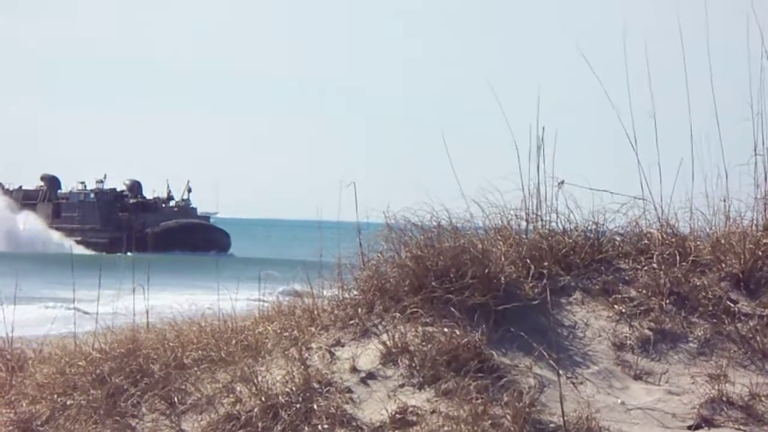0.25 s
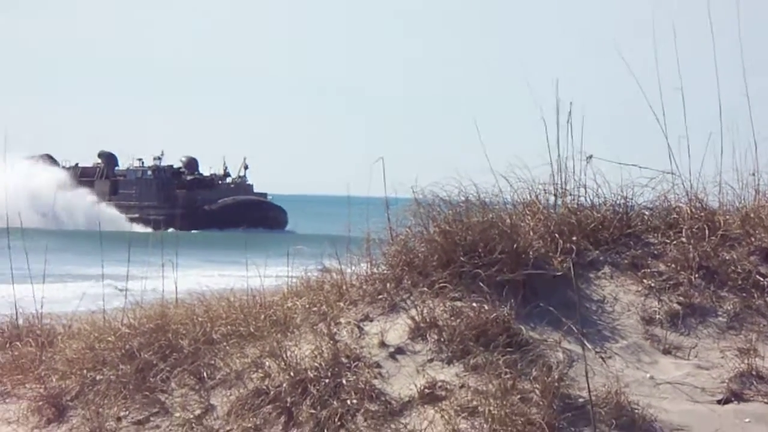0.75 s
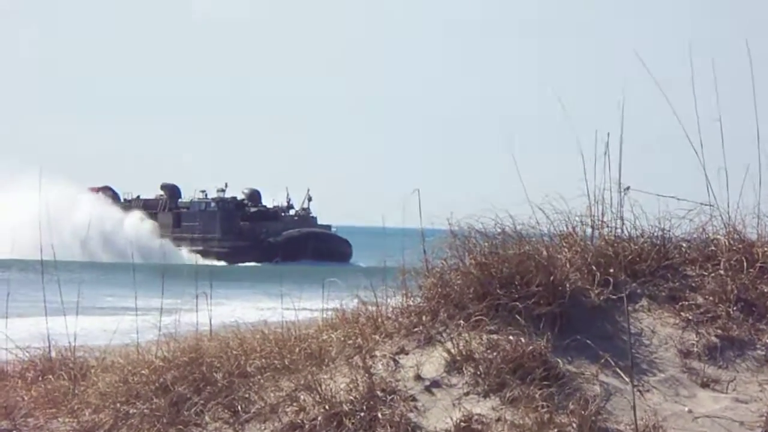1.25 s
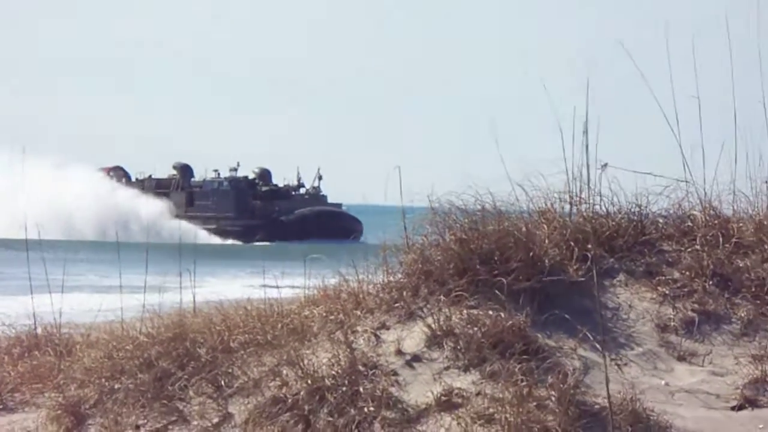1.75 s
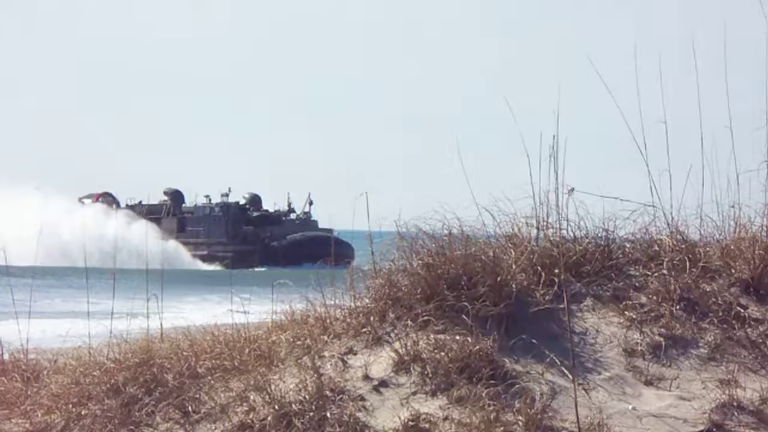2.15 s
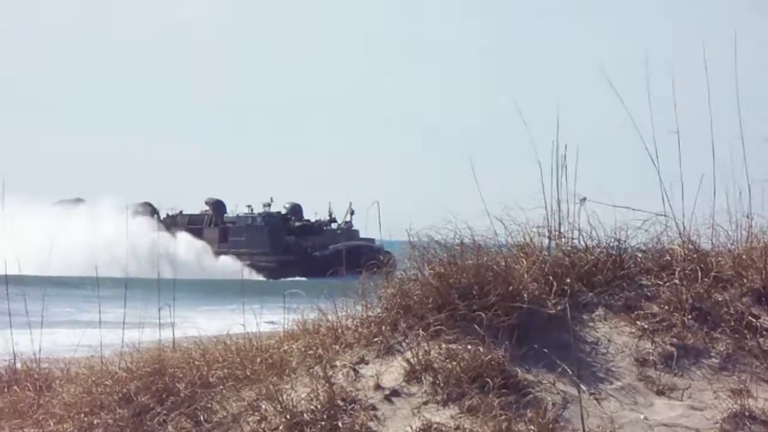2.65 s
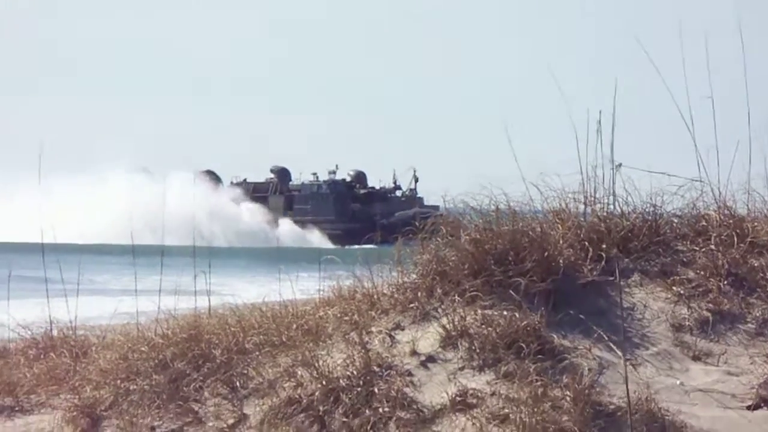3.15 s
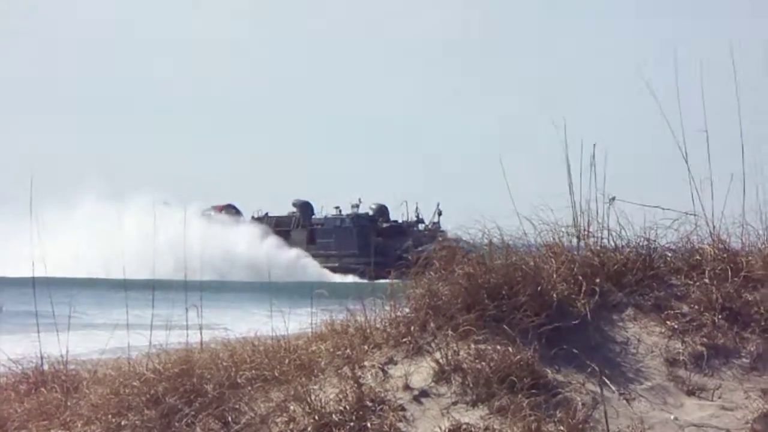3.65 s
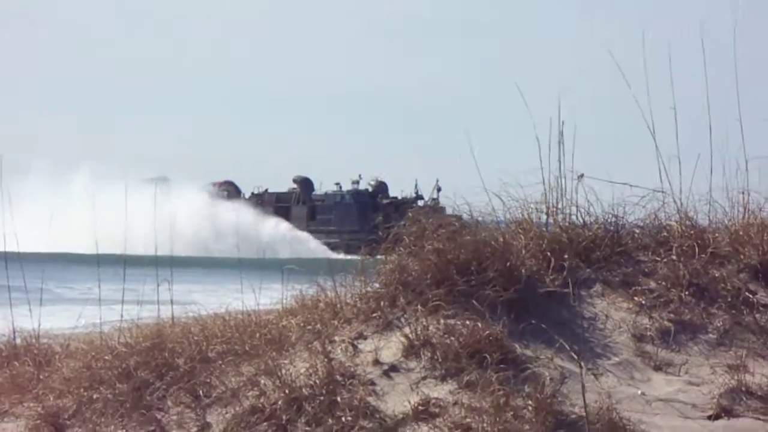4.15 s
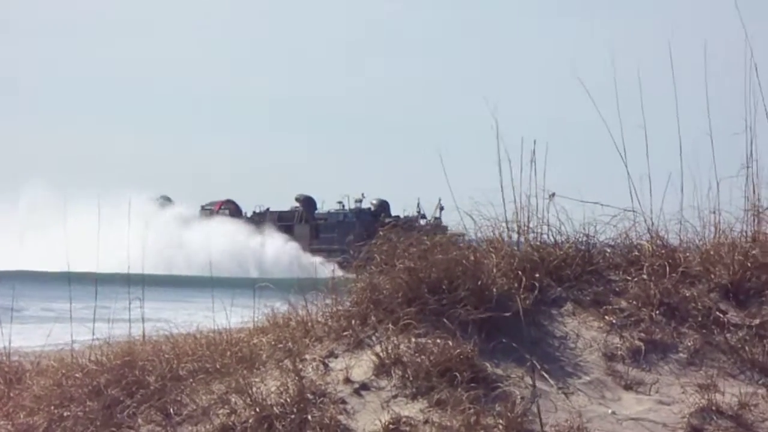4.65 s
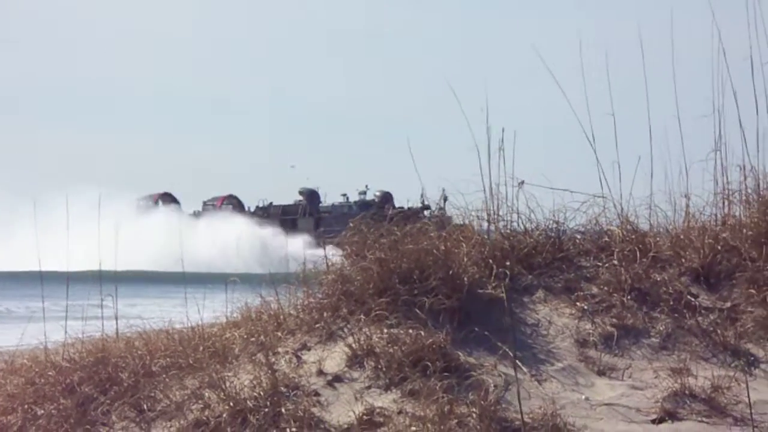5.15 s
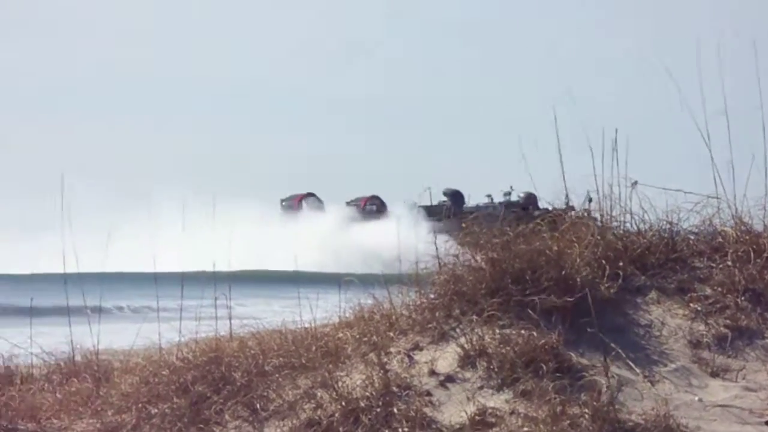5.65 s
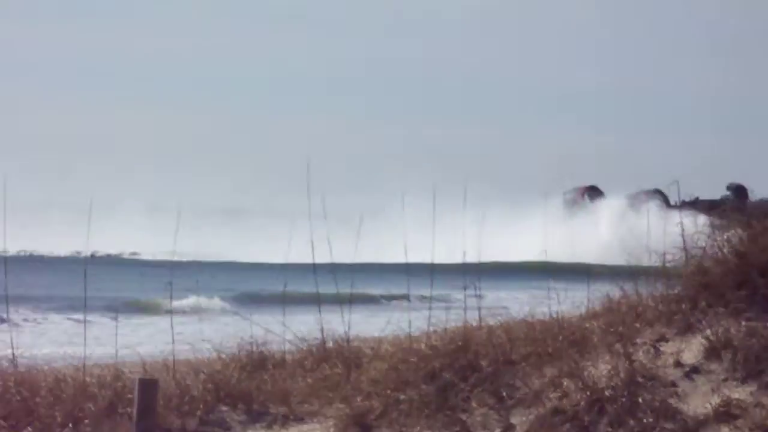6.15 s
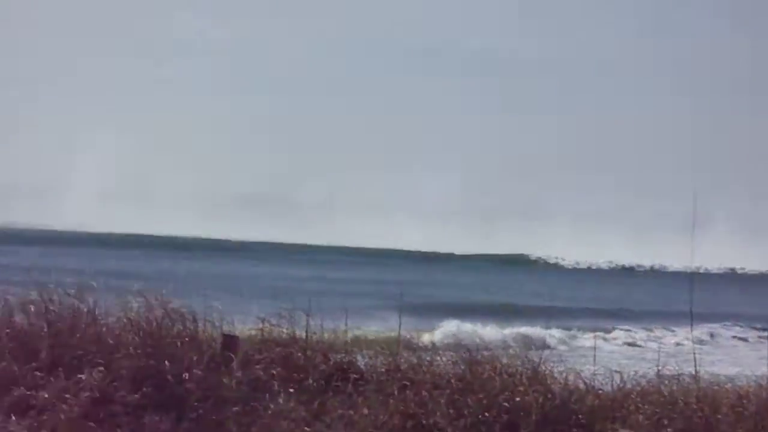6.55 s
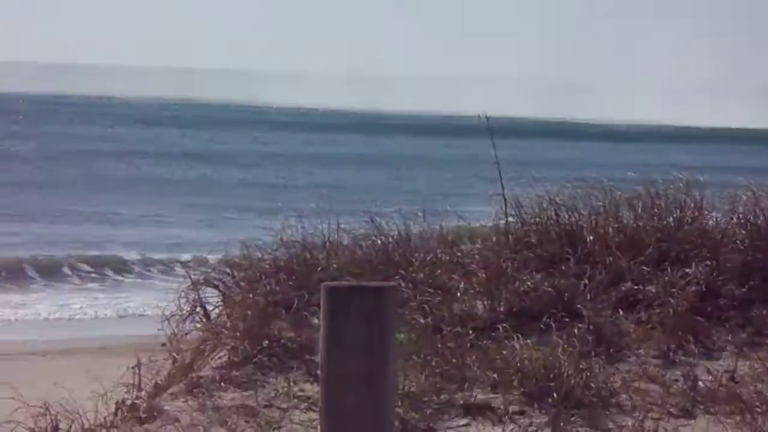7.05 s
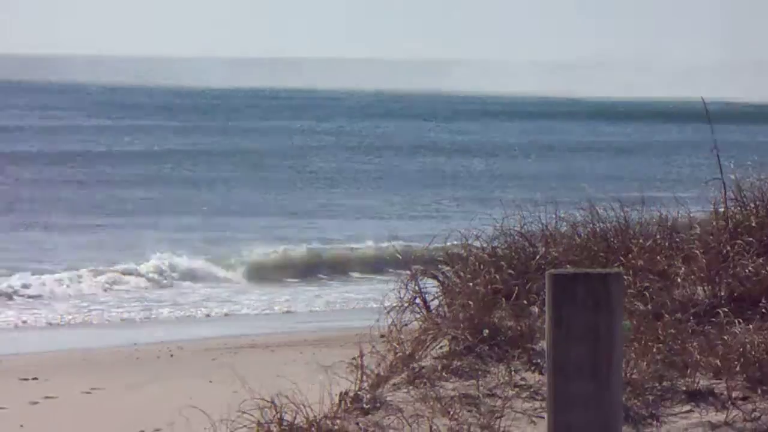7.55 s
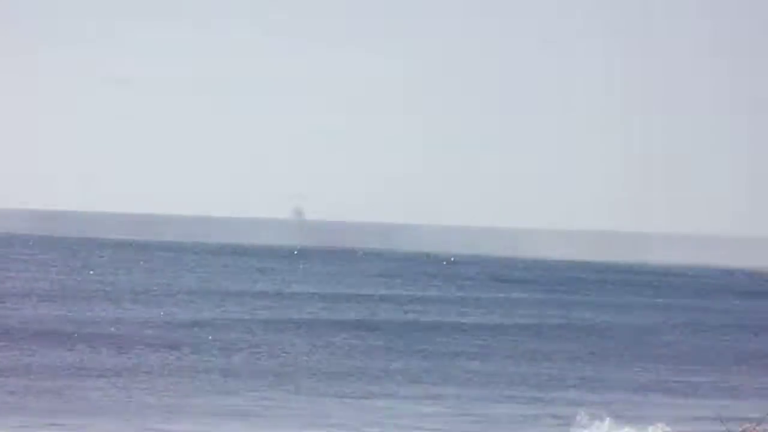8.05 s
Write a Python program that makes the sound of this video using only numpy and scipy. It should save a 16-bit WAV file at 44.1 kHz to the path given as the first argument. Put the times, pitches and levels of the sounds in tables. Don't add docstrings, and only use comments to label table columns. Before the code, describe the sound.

Heavy wind thumps and crackles across one small microphone, with a low beating hovercraft drone and rushing roar behind, and a faint strap scratch late.

```python
import sys
import numpy as np
from scipy import signal
from scipy.fft import rfft, irfft, next_fast_len
from scipy.io import wavfile
from scipy.ndimage import uniform_filter1d, map_coordinates

SR = 44100
rng = np.random.default_rng(int(sys.argv[2]) if len(sys.argv) > 2 else 0)


def store_wav(level_fs):
    pcm = np.round(np.clip(np.atleast_2d(level_fs), -1, 1) * 32767)
    wavfile.write(sys.argv[1], SR, pcm.T.astype(np.int16))


def invert_db(x):
    u = np.asarray(x, float) / 20
    return 10 ** u


N = 365588


def unit(x):
    return x / np.sqrt(np.mean(x ** 2) + 1e-20)


def curves(rows):
    s, *cols = np.transpose(rows)
    return [np.interp(np.arange(N) / SR, s, c) for c in cols]


def wobble(rate_hz):
    at = np.arange(0, N + 16, 16)
    knots = rng.standard_normal(int(N * rate_hz / SR) + 4)
    return np.interp(np.arange(N), at, map_coordinates(knots, [at * rate_hz / SR]))


def swing(db, share):
    return db.mean() + share * (db - db.mean())


def bumps(rows):
    t = np.arange(0, N + 64, 64) / SR
    lift_db = 0 * t
    for middle_s, half_s, db in rows:
        lift_db = lift_db + db * np.exp(-((t - middle_s) / half_s) ** 4)
    return np.interp(np.arange(N) / SR, t, lift_db)


def coloured(x, spectrum):
    m = next_fast_len(N + 8192)
    f, db = np.transpose(spectrum)
    gain = invert_db(np.interp(np.log(np.fft.rfftfreq(m, 1 / SR) + 1), np.log(f + 1), db))
    return irfft(rfft(x, m) * gain, m)[..., :N]


def noise(spectrum):
    return unit(coloured(rng.standard_normal(N), spectrum))


def patches(depth_db):
    z = signal.stft(rng.standard_normal(N + 512), nperseg=512)[2]
    field = uniform_filter1d(rng.standard_normal(z.shape), size=5, axis=0)
    field = uniform_filter1d(field, size=12, axis=1)
    return signal.istft(z * invert_db(depth_db * unit(field)), nperseg=512)[1][:N]


def bursts(times, gains, lengths, rise):
    out = np.zeros(N + SR)
    t = np.arange(SR // 10) / SR
    for s, gain, length in zip(times, gains, lengths):
        out[round(s * SR):][:len(t)] += gain * (1 - np.exp(-t / rise)) * np.exp(-(t / abs(length)) ** 2)
    return out[:N]


def kinks(times, db, hz, spread, turns):
    out = np.zeros(N + SR)
    t = np.arange(-1500, 1500) / SR
    for s, gain, (pitch, phase) in zip(times, invert_db(db), rng.standard_normal((len(times), 2))):
        f = hz * np.exp(spread * pitch)
        bell = np.exp(-(t * f / turns) ** 2)
        out[round(s * SR) - 1500:][:len(t)] += gain * bell * np.sin(2 * np.pi * f * t + 3 * phase)
    return out[:N]


# [freq_hz, level_db]
CLOCK_TONES = [(7714, -72.5), (8285, -82.5)]


def whine():
    t = np.arange(N) / SR
    return sum(invert_db(db + 2.0 * wobble(3)) * np.sqrt(2) * np.sin(2 * np.pi * hz * t) for hz, db in CLOCK_TONES)


# [start_s, peak_db, length_s]
STRAP_TOUCHES = [
    (7.759, -38, 0.015),
    (7.772, -37.5, 0.021),
    (7.775, -38, 0.0017),
    (7.804, -38.5, 0.023),
    (7.82, -45, 0.031),
    (7.856, -43, 0.02),
]
# [freq_hz, level_db]
STRAP_COLOUR = [(2000, -100), (4000, -34), (5500, -10), (6800, 3), (7600, 7), (8300, -5), (8800, -9.5),
                (9300, -47)]


def strap():
    s, peak_db, length_s = np.transpose(STRAP_TOUCHES)
    grain = unit(invert_db(3.2 * wobble(400)) * noise(STRAP_COLOUR))
    return bursts(s, invert_db(peak_db - 5), length_s, rise=0.0011) * grain


# [time_s, strength_db]
WIND_STRENGTH = [(0.0, -30.5), (0.07, -26.5), (0.09, -25), (0.58, -18), (0.78, -30), (0.81, -21.5),
                 (1.25, -18), (1.41, -19), (2.03, -20.5), (4.27, -20.5), (5.49, -22.5), (5.79, -19.5),
                 (5.86, -27), (6.26, -22.5), (6.44, -23), (7.92, -19), (8.2, -26.5), (8.29, -14)]
# [middle_s, half_length_s, lift_db]
WIND_GUSTS = [(.47, 0.033, -6), (1.01, 0.031, -0.5), (1.11, 0.054, -3.5), (1.72, 0.047, 1.5),
              (2.04, .03, -8.5), (2.15, 0.063, 0.5), (2.52, 0.023, -6), (2.6, .04, 2), (3.07, .05, -6.5),
              (3.75, 0.071, 0.5), (3.97, 0.088, 3.5), (4.19, .025, -2), (4.75, 0.24, -1),
              (5.32, 0.031, -5.5), (5.61, 0.052, -3), (6.76, 0.045, 2.5), (7.45, .03, -4.5),
              (7.5, 0.036, 5), (7.75, .1, -4)]
# [freq_hz, level_db]
BUFFET_COLOUR = [(4, -62.5), (12, -13), (22, -2), (50, -4.5), (70, -7), (110, -21), (200, -72), (400, -120)]
# [freq_hz, level_db]
FLUTTER_COLOUR = [(20, -100), (40, -49), (70, -4), (100, 1.5), (140, -0.5), (200, -12.5), (300, -15.5),
                  (600, -33), (1500, -84.5)]


def wind():
    strength_db = curves(WIND_STRENGTH)[0] + bumps(WIND_GUSTS)
    lumps = wobble(22)
    flutter_db = swing(strength_db, 0.6) - 4 + 1.6 * wobble(7)
    buffet = invert_db(strength_db + 1.4) * unit(invert_db(lumps) * noise(BUFFET_COLOUR))
    flutter = unit(invert_db(1.3 * lumps + 2.7 * wobble(60)) * noise(FLUTTER_COLOUR))
    return buffet + invert_db(flutter_db) * flutter


# [crest_s, strength_db, edge_over_strength_db, thump_over_strength_db]
GUST_POPS = [(3.261, -10, -8, -6), (2.6937, -14, -20, 1), (1.5655, -14, -12, -1.5), (1.831, -21, -4, 10),
             (1.9632, -14, -9, 2), (1.9919, -16, -8, 6), (2.4759, -21.5, -3.5, 12), (2.549, -19, -11, -3),
             (2.6394, -15.5, -21, -10), (2.6644, -8.5, -14, -4), (2.6737, -24.5, 7.5, -3),
             (2.7381, -11, -7.5, 5), (2.9493, -19.5, -6.5, 10), (3.0088, -16, -7, 1.5),
             (3.1156, -21.5, -3.5, 4.5), (3.2547, -13, -8, -2.5), (3.2727, -11.5, 3, 0.5),
             (3.6023, -13.5, -16, -3), (3.7982, -9, -13, -9), (3.884, -17, -6.5, -3),
             (3.9306, -15, -7, 6.5), (4.0864, -12, -14, -0.5), (4.1473, -12, -15, -4),
             (4.2558, -18, -8.5, 4), (4.3495, -17, -9.5, 11.5), (4.3893, -15.5, -11, 5),
             (4.456, -19.5, -6.5, 2.5), (4.519, -15.5, -11, 1.5), (4.5395, -13, -10.5, -2),
             (5.7206, -15, -9, -1)]
# [crest_s, strength_db]
AIR_SHOVES = [(0.566, -9.5), (0.9986, -11.5), (1.2779, -9), (1.3658, -10), (1.697, -16), (2.0115, -17),
              (2.3561, -9.5), (2.833, -16.5), (2.9077, -15.5), (2.9664, -16), (2.991, -11), (0.3946, -11),
              (3.314, -9.5), (3.6133, -9), (4.6819, -12.5), (4.767, -14.5), (4.9289, -15.5), (5.1253, -13),
              (5.198, -13), (5.2578, -9), (5.454, -10), (5.482, -17), (5.535, -15.5), (5.7035, -7),
              (6.289, -14), (7.11, -15), (7.284, -11.5), (7.499, -9.5), (7.8326, -11.5), (7.902, -9.5)]
# [start_s, length_s, strength_db]
POP_FLURRIES = [
    (2.63, .045, -19.5),
    (2.7, .05, -24.5),
    (4.453, .03, -25),
    (3.192, .04, -22.5),
    (4.053, .06, -21),
    (4.242, .04, -18.5),
    (4.311, .1, -22),
    (4.528, .025, -15.5),
    (6.592, .09, -21.5),
    (8.135, .07, -19),
]


def contacts():
    rows = [(s, db, db + edge_db, db + thump_db) for s, db, edge_db, thump_db in GUST_POPS]
    rows += [(s, db - 8, db - 20.5, db) for s, db in AIR_SHOVES]
    gap_s, scatter_db = 0.016, 2
    for start_s, length_s, db in POP_FLURRIES:
        chance = rng.standard_normal((12, 4))
        for k in range(min(12, 1 + int(length_s / gap_s))):
            puff_db, edge_db, thump_db = db + scatter_db * chance[k, 1:]
            crest_s = start_s + gap_s * (k + 0.2 * chance[k, 0])
            rows.append((crest_s, puff_db, edge_db - 8, thump_db))
    return np.transpose(rows)


# [freq_hz, level_db]
SPLUTTER_COLOUR = [(150, -39), (300, -2.5), (500, -1.5), (900, -10.5), (1500, -16.5), (2600, -35),
                   (4000, -60), (8000, -120)]


def pops():
    s, puff_db, edge_db, thump_db = contacts()
    puff = kinks(s, puff_db - 0.9, hz=360, spread=0.16, turns=0.54)
    edge = kinks(s, edge_db - 0.4, hz=850, spread=0.1, turns=0.48)
    edge += kinks(s, edge_db - 8, hz=1800, spread=0.29, turns=0.44)
    thump = kinks(s, thump_db - 1.5, hz=115, spread=0.076, turns=0.56)
    spit = bursts(s - 0.004, invert_db(edge_db - 4), np.full(len(s), 0.0095), rise=0.0023)
    return puff + edge + thump + spit * noise(SPLUTTER_COLOUR)


# [time_s, level_db]
ROAR_LEVEL = [(0.0, -42.5), (0.3, -38), (0.83, -42), (1.27, -37.5), (1.91, -46), (2.28, -41), (2.72, -49),
              (3.81, -45), (4.18, -51), (4.59, -50), (5.06, -41), (5.4, -43.5), (6.6, -38), (6.76, -40.5),
              (7.18, -39), (7.78, -43.5), (8.08, -41), (8.29, -36)]
# [middle_s, half_length_s, lift_db]
ROAR_SWELLS = [(1.2, .05, -1), (1.36, .06, 2), (1.5, 0.048, -2), (5.2, .06, -1), (1.68, 0.07, 2.5),
               (3.2, 0.1, 4.5), (3.53, 0.072, 2.5), (3.94, 0.073, 3), (4.72, .08, 3.5), (6.24, 0.079, 2),
               (6.42, 0.13, 0), (6.65, 0.075, 3), (7.45, .08, 1.5), (8.0, 0.047, -3), (8.15, 0.084, 2.5)]


def carried():
    return curves(ROAR_LEVEL)[0] + bumps(ROAR_SWELLS)


# [freq_hz, level_db]
BODY_COLOUR = [(100, -22), (170, -4.5), (195, -8.5), (238, -6.5), (281, -18), (456, -12), (651, -16.5),
               (1490, -32.5), (1800, -33.5), (2340, -53.5), (3960, -120)]
# [freq_hz, level_db]
TOP_COLOUR = [(590, -22.5), (1000, -0.5), (1530, -1), (2030, -8.5), (2830, -10.5), (3800, -27),
              (4940, -58.5), (8360, -120)]


def roar():
    roar_db = carried()
    swell_db = wobble(14)
    body_db = swing(roar_db, 0.72) + 8 + swell_db + 0.63 * wobble(30)
    top_db = roar_db + 0.5 + swell_db
    body = invert_db(body_db) * unit(coloured(patches(depth_db=1.0), BODY_COLOUR))
    return body + invert_db(top_db) * unit(coloured(patches(depth_db=1.0), TOP_COLOUR))


# [time_s, first_hz, second_hz]
BLADE_RATES = [(0, 75, 78.5), (1, 76, 78.34), (2.5, 76, 77.9), (4.5, 76, 77.96), (5.5, 77, 77.76),
               (6.5, 76, 77.5), (7.3, 77, 77.52), (8.29, 75.5, 78.22)]
# [time_s, fundamental_db, octave_db]
DRONE_LEVELS = [(0.0, -15, -35.5), (0.16, -18, -27), (2.31, -19, -31), (2.86, -19.5, -43),
                (3.19, -28.5, -30.5), (3.44, -22, -35.5), (3.58, -26, -28), (3.69, -19.5, -43),
                (4.32, -25.5, -33), (5.01, -22.5, -33.5), (5.17, -16.5, -28.5), (5.42, -22.5, -45),
                (5.54, -16, -38), (6.95, -17.5, -28), (7.16, -28, -21), (7.76, -20, -30), (7.87, -34, -25),
                (8.29, -15.5, -24)]
# [order, level_over_octave_db]
LOW_OVERTONES = [(3, -11), (4, -21)]
# [order, level_over_roar_db]
HIGH_OVERTONES = [(5, -6.5), (6, -7.5), (7, -11.5), (8, -22), (10, -19.5)]
# [order, middle_s, half_length_s, lift_db]
ORDER_SINGS = [(5, 0.6, 0.57, 2.5), (5, 5.8, 0.64, 8.5), (5, 5.86, 0.046, 7), (6, 5.05, 0.18, 7.5),
               (6, 6.64, 0.056, 11.5), (1, 6.12, 0.069, -7.5), (1, 3.78, .08, 6), (7, 8.15, .1, 12.5),
               (6, 8.15, .1, 6.5), (4, 1.1, 0.41, 11), (4, 8.1, 0.25, 8), (3, .25, 0.17, 6.5),
               (3, 5.2, 0.081, 7.5), (3, 7.4, 0.075, 8), (1, 0.52, .04, -4), (1, 2.2, 0.065, -11.5),
               (1, 1.5, 0.068, -13), (1, 1.997, 0.075, -10), (1, 2.32, 0.56, 0), (1, 2.72, .06, -11),
               (1, 4, .1, -14), (1, 7.2, 0.065, 7), (1, 3.8, .06, -12), (1, 6.6, 0.055, -4.5),
               (1, 7.35, 0.06, 1), (1, 4.4, 0.087, -7), (2, 6.1, .06, 4), (2, .67, 0.039, -4.5),
               (2, 4.7, .2, -6), (2, 6.8, 0.27, 4)]


def propellers():
    first, second = (2 * np.pi * np.cumsum(hz) / SR + 0.13 * wobble(6) for hz in curves(BLADE_RATES))
    low_db, octave_db = curves(DRONE_LEVELS)
    roar_db = carried()
    shimmer_db, shimmer_hz = 2, 8
    orders = [(1, low_db - 0.7), (2, octave_db - 0.6 + 1.8 * wobble(shimmer_hz))]
    for k, db in LOW_OVERTONES:
        orders.append((k, swing(octave_db, 0.28) + db + shimmer_db * wobble(shimmer_hz)))
    for k, db in HIGH_OVERTONES:
        orders.append((k, roar_db + db + shimmer_db * wobble(shimmer_hz)))
    out = np.zeros(N)
    for k, db in orders:
        lean = 0.22 if k == 1 else 1.22
        a = np.cos(lean) * np.cos(k * first + (k - 1) * rng.uniform(0, 6.8))
        b = np.sin(lean) * np.cos(k * second + (k - 1) * rng.uniform(0, 7.104))
        sings_db = bumps([row[1:] for row in ORDER_SINGS if row[0] == k])
        out += invert_db(db + sings_db + 0.98 * wobble(11)) * np.sqrt(2) * (a + b)
    return out


# [time_s, drop_db, recovery_s]
GAIN_DUCKS = [
    (2.0, 3, 0.038),
    (2.482, 8, 0.048),
    (2.749, 9, 0.07),
    (3.279, 9, 0.074),
    (4.558, -2, 0.073),
    (5.258, 6, 0.059),
    (5.48, 1.5, 0.042),
    (5.729, 9.5, 0.025),
]


def ducking():
    t = np.arange(N) / SR
    drop_db = sum(db * np.exp(-np.abs(t - s) / back_s) * (t > s) for s, db, back_s in GAIN_DUCKS)
    return invert_db(-uniform_filter1d(drop_db, size=130))


def scene():
    steady = propellers() + roar() + wind() + whine()
    return (steady * ducking() + pops() + strap())[None]


# [freq_hz, level_db]
HISS_COLOUR = [(30, -24), (300, -7), (4000, 1), (7470, 0.5), (8010, -5.5), (8620, -17.5), (8850, -25),
               (9300, -68)]


def companded(x):
    x = x / (1 + np.abs(x / 0.86) ** 4) ** (1 / 4)
    step = np.sqrt(x ** 2 + 0.039 ** 2)
    return x + invert_db(-38.0) * step * noise(HISS_COLOUR)


# [freq_hz, level_db]
CAMERA_RESPONSE = [(20, 2), (60, 1.5), (140, 0), (200, 3.5), (310, 2.5), (600, -0.96), (790, 2.5),
                   (1050, -0.4), (1900, -1), (4000, 0), (5500, 1.04), (8600, 0.5), (9050, -30), (9600, -93)]


def band_limited(x):
    stop = np.minimum((N + 8 - np.arange(N)) / 90, 1)
    return coloured(x * stop, CAMERA_RESPONSE)


def low_pass(x):
    return signal.sosfilt(signal.butter(12, 9000, fs=SR, output="sos"), x)


def record(dry):
    mix = band_limited(companded(dry))
    return low_pass(mix)


dry = scene()
out = record(dry)
store_wav(out)
```